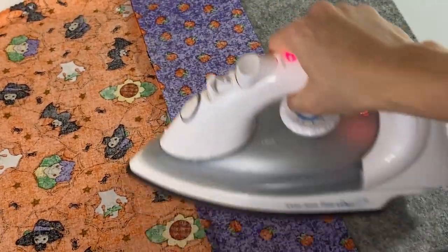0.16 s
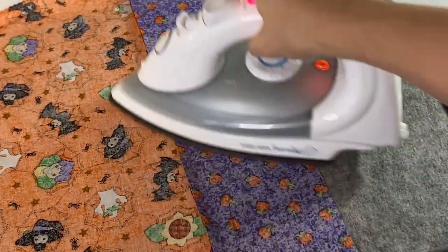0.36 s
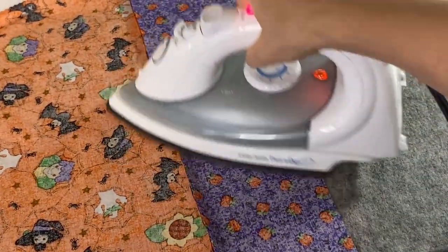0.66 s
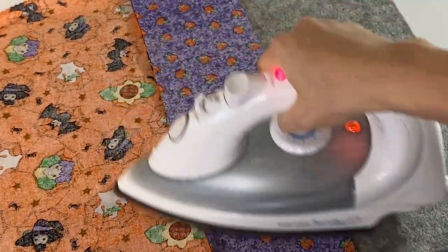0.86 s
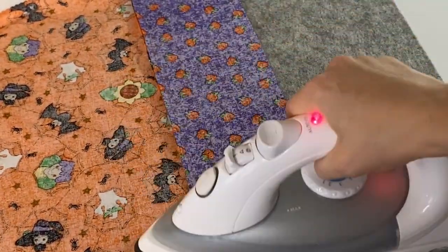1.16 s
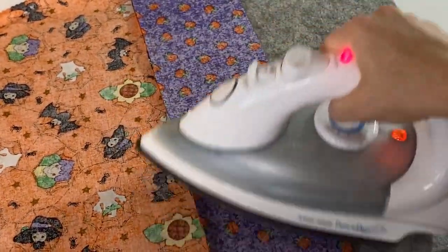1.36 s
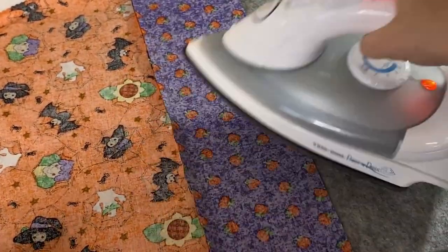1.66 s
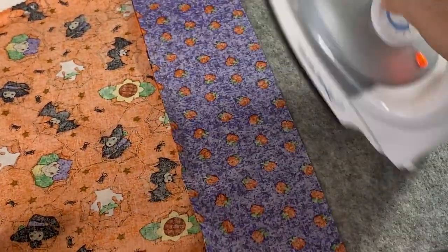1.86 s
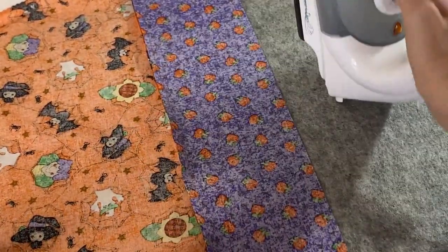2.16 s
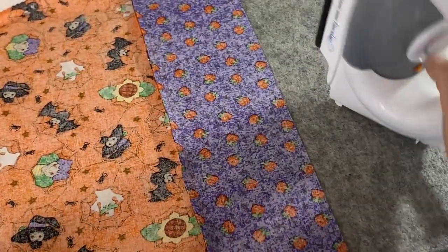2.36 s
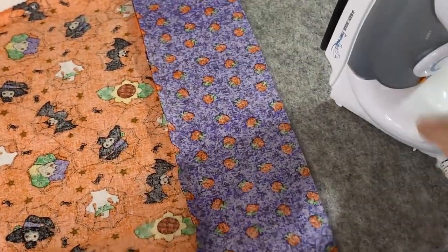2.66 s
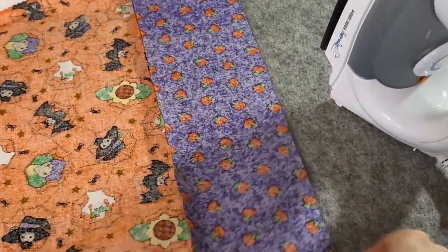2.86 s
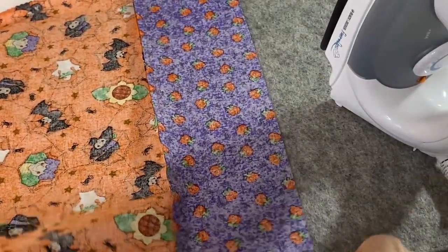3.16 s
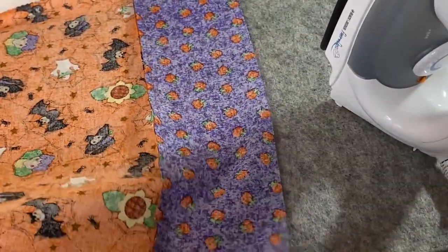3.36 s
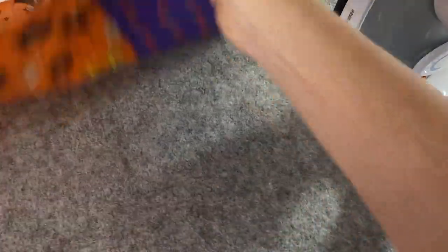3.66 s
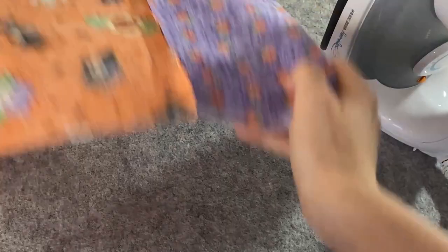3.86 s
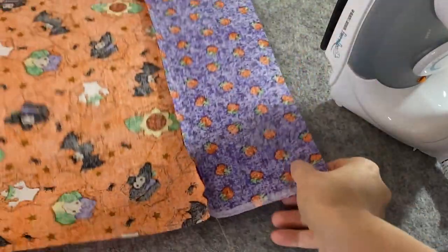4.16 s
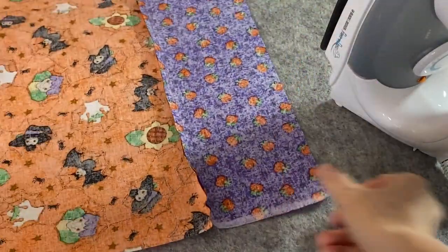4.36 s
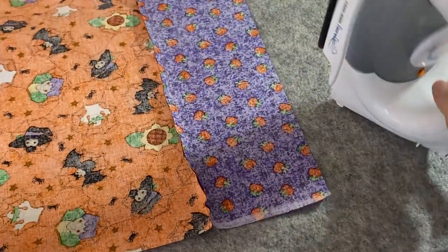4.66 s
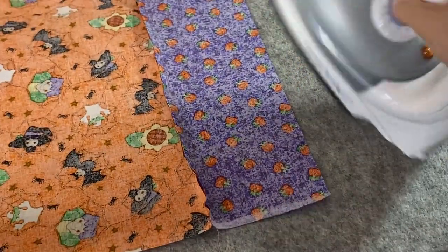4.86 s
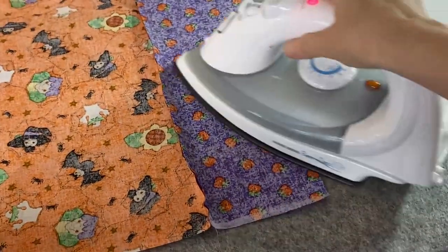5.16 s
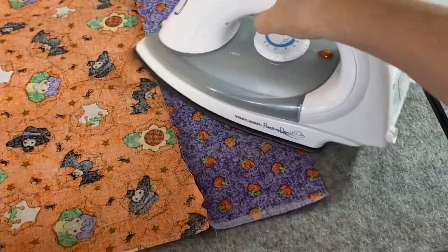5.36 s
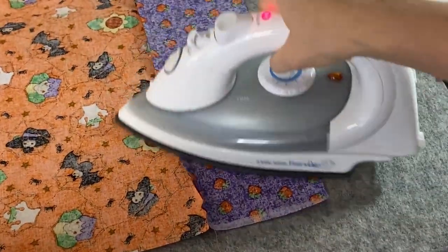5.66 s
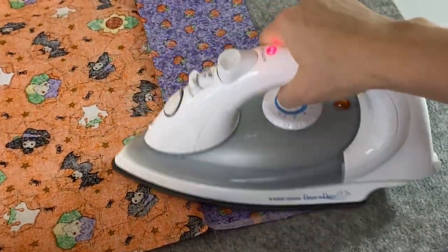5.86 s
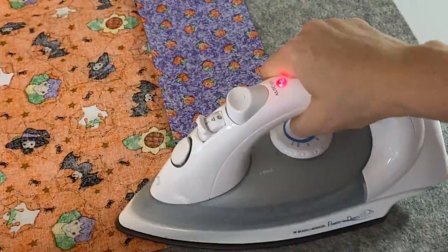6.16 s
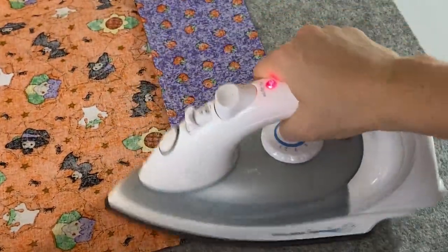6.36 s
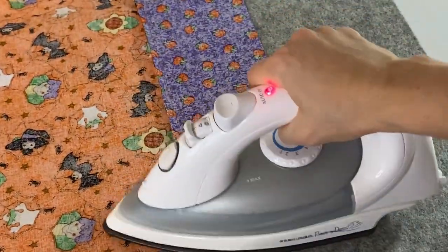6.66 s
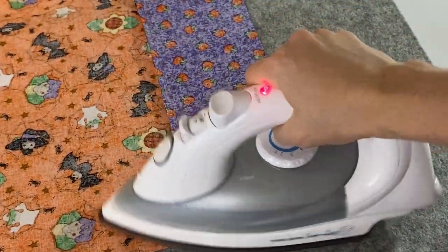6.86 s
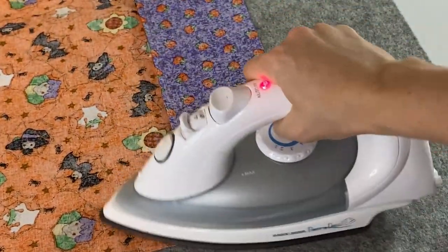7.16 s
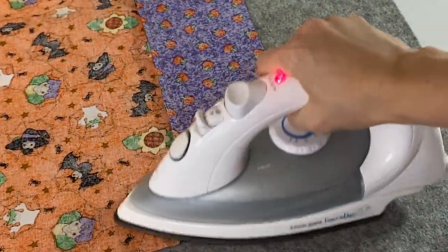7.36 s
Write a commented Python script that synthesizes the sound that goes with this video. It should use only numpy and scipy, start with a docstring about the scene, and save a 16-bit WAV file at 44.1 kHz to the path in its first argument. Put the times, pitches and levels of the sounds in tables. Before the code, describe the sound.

Close, quiet ironing sounds: low muffled thuds, brushing fabric and felt rustle, small plastic ticks, and one bright clack as the iron is picked up.

```python
"""Iron on cotton over a felt mat

Small quiet room, close pair of microphone ports: an iron is set down, slid and lifted on cotton laid over
a felt mat on a table, and a hand turns the cloth over. Sole and cloth hiss and the mat rustles: flickering
noise that follows the speed of each stroke. Below, the table rumbles as slow noise and thuds as struck modes;
the plastic housing ticks and creaks as short rough contacts that ring its modes."""
import sys
import numpy as np
from scipy import signal
from scipy.fft import rfft, irfft
from scipy.io import wavfile

SR = 44100
rng = np.random.default_rng(int(sys.argv[2]) if len(sys.argv) > 2 else 0)


def persist_wave(psi):
    """Save psi, clipped to +-1, as 16-bit WAV."""
    counts = np.round(np.clip(psi, -1, 1) * 32767).astype(np.int16)
    wavfile.write(sys.argv[1], SR, np.atleast_2d(counts).T)


N = 331146
HZ = np.maximum(np.fft.rfftfreq(N, 1 / SR), 1)   # transform grid, kept above 0 for the log axis


def from_db(db):
    """Level in dB to gain."""
    return 10 ** (np.asarray(db) / 20)


def in_time(rows):
    """Columns of a curve table, one value per sample."""
    s, *columns = np.transpose(rows)
    return [np.interp(np.arange(N) / SR, s, column) for column in columns]


def at_hz(points):
    """A spectrum table on the transform grid, straight on a log axis."""
    hz, value = np.transpose(points)
    return np.interp(np.log(HZ), np.log(np.maximum(hz, 1)), value)


def rms_one(x):
    """Scale to unit rms."""
    return x / np.sqrt(np.mean(x ** 2) + 1e-20)


def coloured(x, spectrum):
    """Filter by a spectrum that closes outside its ends."""
    inside = (HZ >= spectrum[0][0]) & (HZ <= spectrum[-1][0])
    return irfft(rfft(x) * from_db(at_hz(spectrum)) * inside, N)


def add(out, s, sound):
    """Mix a sound in at time s."""
    i = round(s * SR)
    out[i:i + len(sound)] += sound[:N - i]


def friction(level_db, spectrum, flicker_db, flicker_hz):
    """Fibres catching and slipping: flickering coloured noise; rows are direct, left room, right room."""
    slow = signal.butter(2, flicker_hz, fs=SR, output="sos")
    flicker = rms_one(signal.sosfilt(slow, rng.standard_normal(N)))
    noise = rms_one(coloured(rng.standard_normal((3, N)), spectrum))
    return from_db(level_db + flicker_db * flicker) * noise


# strokes of the sole or the hand over the cloth, levels at mid-stroke, fades from start to end (negative grows):
# t/s, length/s, hiss level/dB, sheen level/dB, mat rustle level/dB, fade of hiss and sheen/dB, fade of rustle/dB
STROKES = [(-0.08, 0.16, -58, -71, -49.5, 8, -1), (-0.1, 0.62, -66.5, -69, -66, -2, 4),
           (0.52, 0.12, -69.5, -73, -74, -9, 3), (0.597, 0.53, -65.5, -67, -62.5, 3, 13.5),
           (1.035, 0.12, -64, -84, -58, -2, 0), (1.134, 0.17, -75.5, -82, -80, 9, 0),
           (1.27, 0.15, -74, -77, -79, 0, 3), (1.343, 0.18, -67.5, -78, -57.5, 8, 17),
           (1.478, 0.23, -69, -83, -64.5, 0, 6), (1.653, 0.3, -71, -76, -60.5, -2, -4),
           (1.933, 0.3, -77, -78, -70.5, 9, 5), (2.158, 0.2, -71, -77, -58.5, -8, -2),
           (2.338, 0.26, -74, -81, -63.5, 7, -7), (2.458, 0.25, -79, -81, -64, 2, 15),
           (2.63, 0.13, -75.5, -74, -76, 0, 5), (2.736, 0.1, -69, -78, -60.5, -5, 15),
           (2.805, 0.24, -67, -70.5, -63, 1, 13), (3.024, 0.22, -67, -72, -68, 3.5, 10),
           (3.199, 0.26, -71, -75, -64, 13, 11), (3.385, 0.29, -66.5, -69.5, -62.5, -2, -6),
           (3.62, 0.32, -73.5, -78.5, -67, 4, -5), (3.893, 0.29, -76.5, -76.5, -84, -11, 1),
           (4.051, 0.17, -68, -70.5, -71.5, 0, -4), (4.223, 0.14, -76.5, -78, -73.5, -4, -6),
           (4.61, 0.24, -71, -77, -69, -2, -8), (4.689, 0.095, -66, -70, -55, 7, 0),
           (4.784, 0.36, -77.5, -86, -60.5, 4, 2), (5.051, 0.15, -61, -70, -54.5, 11, 3),
           (5.116, 0.36, -67.5, -70.5, -63.5, 3.5, -3), (5.46, 0.724, -67, -69.5, -66, 4, 15),
           (6.152, 0.2, -67, -69, -63.5, 1, 2), (6.327, 0.16, -67, -66, -64, 3, 0),
           (6.472, 0.13, -62.5, -67, -61, 0, -4), (6.583, 0.14, -67.5, -68.5, -68, 3, 13),
           (6.702, 0.14, -66, -67, -64.5, 4, -13), (6.822, 0.14, -70, -68.5, -69, 4, 11),
           (6.935, 0.26, -68.5, -68.5, -63, 1, -7), (7.16, 0.14, -70, -72, -64, 7, -16),
           (7.252, 0.47, -65.5, -67.5, -65.5, -6, -2)]
# hiss, sheen and rustle: power of the speed with which each one's amplitude grows
SPEED_POWERS = (0.52, 0.76, 0.54)
# hiss, sheen and rustle with nothing moving: level/dB
STILL_DB = (-85.5, -90.5, -72.5)
SPEED_UP_S, SLOW_DOWN_S = 0.057, 0.072   # a stroke gathers and loses speed
ARCH = 0.3   # share of the speed that swells towards mid-stroke


def strokes():
    """Levels in dB of hiss, sheen and rustle: each follows the speed of the stroke and fades along it."""
    t = np.arange(N) / SR
    power = from_db(STILL_DB)[:, None] ** 2 * np.ones(N)
    for s, length, *levels_db, fade_db, mat_fade_db in STROKES:
        speeding_up, slowing_down = (t - s) / SPEED_UP_S, (s + length - t) / SLOW_DOWN_S
        speed = np.clip(np.minimum(speeding_up, slowing_down), 0, 1)
        on = speed > 0
        along = (t[on] - s) / length - .5   # -0.5 at the start, 0.5 at the end
        swell = speed[on] * (1 - ARCH + ARCH * np.cos(np.pi * along))
        fades_db = (fade_db, fade_db, mat_fade_db)
        for row, db, growth, fade in zip(power, levels_db, SPEED_POWERS, fades_db):
            row[on] += (from_db(db - fade * along) * swell ** growth) ** 2
    return 10 * np.log10(power)


# colour of the cloth's hiss: f/Hz, relative level/dB per Hz
HISS = [(700, -11), (1100, -1), (1600, -1.5), (2200, -1), (3000, 0.5), (4200, -2.5), (5500, -3), (7000, -7),
        (9000, -25)]
# colour of the treble sheen over it: f/Hz, relative level/dB per Hz
SHEEN = [(5500, -20.5), (7500, 2), (10000, 1.5), (12000, -2), (14000, -2.5), (15500, -2)]


def cloth_slide(hiss_db, sheen_db):
    """Sole and cotton rub: a hiss and a finer treble sheen, each flickering on its own."""
    hiss = friction(hiss_db, HISS, flicker_db=0.85, flicker_hz=22.5)
    return hiss + friction(sheen_db, SHEEN, flicker_db=1.0, flicker_hz=20)


# colour of the felt mat's rustle: f/Hz, relative level/dB per Hz
RUSTLE = [(200, 0), (300, 1), (450, -2.5), (650, -5.5), (900, -13.5), (1300, -23), (2000, -24.5)]


def mat_rustle(rustle_db):
    """The felt under the stroke catches more unevenly, a low rustle with deep flicker."""
    return friction(rustle_db, RUSTLE, flicker_db=2.8, flicker_hz=25)


# rumble of the table under the weight: t/s, deep level/dB, upper level/dB
PUSH = [(0.0, -61, -57), (0.21, -52, -68), (0.44, -66, -62.5), (1.38, -61.5, -62.5), (2.2, -68.5, -62.5),
        (2.49, -54, -63.5), (2.95, -67.5, -60.5), (3.49, -57.5, -67), (3.62, -53.5, -53),
        (3.78, -55, -59.5), (4.1, -63, -71.5), (4.31, -68, -61.5), (4.6, -57.5, -68), (5.23, -58.5, -61),
        (5.83, -66, -68.5), (6.32, -65, -64.5), (6.98, -63, -63), (7.51, -62, -68)]
# colour of the deep rumble: f/Hz, relative level/dB per Hz
DEEP = [(20, -39), (35, -11), (55, -6.5), (80, -4), (110, -14), (150, -26.5)]
# colour of the upper rumble: f/Hz, relative level/dB per Hz
UPPER = [(80, -17), (115, -1), (170, -1), (250, -8), (330, -23), (450, -16)]


def table_rumble():
    """The table under the shifting weight: two bands of low noise, each with its own slow level."""
    deep_db, upper_db = in_time(PUSH)
    deep = friction(deep_db, DEEP, flicker_db=1.7, flicker_hz=19)
    return deep + friction(upper_db, UPPER, flicker_db=3.0, flicker_hz=8.2)


def ring(force, hz, t60):
    """One mode: a unit click sets a decaying sine of starting height 1 ringing."""
    r = from_db(-60 / (t60 * SR))
    w = 2 * np.pi * hz / SR
    return signal.lfilter([0, np.sin(w)], [1, -2 * r * np.cos(w), r * r], force)


def body(modes, force, stiff_db):
    """All modes of one part, scaled to peak 1; stiff_db an octave favours the upper ones."""
    out = 0
    for k, (hz, db, t60) in enumerate(modes):
        mode = ring(force, hz, t60)
        height = from_db(db + stiff_db * np.log2(hz / modes[0][0]))
        out = out + (-1) ** k * height * mode / np.abs(mode).max()
    return out / np.abs(out).max()


# ticks and creaks of the housing, levels ahead of colouring and ports:
# t/s, crack level/dB, hollow knock level/dB, bright edge level/dB, contact/ms,
# ring of the hard modes against the crack level/dB
TICKS = [(0.0441, -44, -52.5, -55.5, 4.6, -19), (0.554, -55.5, -81, -66, 2.4, -10),
         (0.6169, -43.5, -64, -54, 2.9, -15), (1.1117, -45.5, -59, -67, 5.7, -15),
         (1.353, -49, -59, -62.5, 9.6, -6), (1.419, -52, -62.5, -78, 2.1, -8),
         (1.5213, -53, -68, -80, 2.4, -10), (1.834, -47, -46, -73, 8.1, -14),
         (1.8678, -41, -78, -59, 2.2, -26), (1.8848, -46.5, -44.5, -69, 3.1, -3.5),
         (1.949, -50, -54, -63, 6, 15.5), (2.0317, -72, -56.5, -79, 1.3, -3),
         (2.1885, -53, -57.5, -82, 1.3, -8), (2.2077, -47.5, -63, -69, 5.3, -25),
         (2.2821, -56, -53, -54, 2.3, 0.5), (2.4519, -40, -50.5, -76, 1.6, -15.5),
         (2.7557, -41.5, -57.5, -67, 12, -8), (3.2282, -51.5, -53.5, -63, 3.7, -11),
         (3.347, -55, -63, -70, 2.5, -10), (3.4173, -59, -60, -74, 3, -8),
         (3.6104, -48, -57.5, -70, 2, -23), (3.8186, -55, -61.5, -69, 10, -10),
         (4.6279, -46.5, -60.5, -56, 3.9, -19), (4.7201, -47, -46.5, -71, 2, -9),
         (4.7312, -55, -44, -73, 2.8, -12), (4.7404, -59, -46, -77, 6, -4),
         (4.7644, -54, -52, -79, 1.9, -12), (4.7884, -66, -52, -80, 1.5, 0),
         (4.848, -38, -59, -88, 3.8, -8.5), (4.9493, -60, -57.5, -88, 2.7, -9),
         (5.0099, -47, -67, -86, 8.5, -11), (5.062, -25, -43, -48, 2.6, -33),
         (5.0758, -35.5, -51, -46, 9, -18), (5.3512, -59, -56, -60.5, 2.1, -4),
         (5.489, -41.5, -56, -56.5, 4, -19), (5.5014, -40, -58, -76, 4.1, -12),
         (5.941, -44, -56, -58, 5.2, -16), (6.067, -54, -66, -60, 3.6, -12),
         (6.1608, -40.5, -59.5, -48.5, 3.6, -18), (6.186, -62, -72, -60, 2.5, -12),
         (6.334, -40.5, -59.5, -55, 2.7, -29), (6.3476, -41.5, -52, -49.5, 1.7, -15),
         (6.367, -51, -59, -53, 3.6, -13), (6.5176, -53, -52, -59, 6.1, 1), (6.7298, -43, -61, -58, 3, -25),
         (7.047, -60, -71, -44, 2, -5), (7.3873, -70, -64, -48.5, 2.8, -14),
         (7.4028, -44, -70, -53, 2.5, -20), (7.422, -41.5, -51, -50, 2.6, -8)]
# hollow modes of the housing: f/Hz, level/dB, t60/s
HOLLOW = [(444, 1.5, 0.0054), (620, 2, 0.015), (708, -2.5, 0.037), (826, -1.5, 0.02), (943, -8.5, 0.04),
          (1193, -3, 0.0085)]
# hard modes of the housing: f/Hz, level/dB, t60/s
HARD = [(2740, -2, .045), (3000, -1, .05), (3340, 0, .04), (3700, -9, .03), (4300, -14, .04),
        (5580, -11, .045), (10700, -22, .04), (13420, -17, .08)]
# colour of the crack: f/Hz, gain/dB
CRACK = [(900, 5), (1400, -1), (2000, -2.5), (2400, 3.5), (2900, 2.5), (3500, 0.5), (4500, -3), (6000, -42)]
# colour of the bright edge: f/Hz, gain/dB
BRIGHT = [(3500, 11.4), (5000, 10), (7000, 8.7), (10000, 9.5), (13000, 0.33), (16000, 8.1)]
# colour of the loose rattle: f/Hz, gain/dB
RATTLE = [(1500, -31), (2300, -5), (2900, 2), (3600, -9), (5000, -30)]
RATTLE_DB, RATTLE_MS = -11, 59   # loose parts shake on after a tick: level under the ring, decay constant
CREST_DB = 6.5   # peak of a hollow knock over its table level


def ticks():
    """A short rough contact gives a broad crack with a bright edge, rings the modes and leaves a loose rattle."""
    out, crack, edge, rattle = np.zeros((4, N))
    t = np.arange(SR // 4) / SR
    draws = rng.standard_normal((len(TICKS), 5, len(t)))
    for (s, crack_db, hollow_db, bright_db, contact_ms, ring_db), draw in zip(TICKS, draws):
        x = 1000 * t / contact_ms
        force = draw * (1 - np.exp(-6 * x)) * np.exp(-x)
        hard_db = crack_db + ring_db
        stiff_db = 2.8 * min(ring_db + 1, 0)   # only clear, ringing blows reach the top modes
        add(out, s, from_db(hard_db) * body(HARD, force[0], stiff_db))
        add(out, s, from_db(hollow_db + CREST_DB) * body(HOLLOW, force[1], 0))
        add(crack, s, from_db(crack_db) * force[2])
        add(edge, s, from_db(bright_db) * force[3] * np.exp(-.4 * x))   # the treble dies first
        shake = draw[4] * np.exp(-1000 * t / RATTLE_MS)
        add(rattle, s, from_db(hard_db + RATTLE_DB) * shake)
    return out + coloured(crack, CRACK) + coloured(edge, BRIGHT) + coloured(rattle, RATTLE)


# thuds on the table, ahead of the ports: t/s, peak level/dB, centre of the blow f/Hz, added damping/(1/s)
THUDS = [(0.046, -32.5, 154, 30), (0.054, -29.5, 133, 30), (0.057, -36, 332, 49), (0.065, -23.5, 89.5, 28),
         (0.085, -26, 73, 21), (0.159, -28.5, 68.4, 21), (0.176, -34, 72, 62), (1.25, -50.5, 58, 20),
         (1.831, -43.5, 178, 35), (2.275, -47, 148, 53), (2.497, -43, 273, 22), (2.848, -38.5, 178, 22),
         (3.146, -38, 52.3, 8), (3.236, -43.5, 172, 26), (3.448, -39, 65, 22), (3.493, -36.5, 72, 40),
         (3.561, -40, 61.5, 45), (3.627, -37.5, 112, 20), (3.663, -36.5, 71, 23), (3.71, -33.5, 66, 37),
         (3.868, -38.5, 49.5, 10), (3.939, -35.5, 159, 74), (3.952, -28, 69, 37), (4.51, -44.5, 51, 7.4),
         (5.068, -38.5, 69, 15), (5.073, -40.5, 200, 7.6), (5.09, -35.5, 54, 46), (5.105, -41, 192, 7.3),
         (5.134, -43, 196, 8.6), (5.18, -40.5, 154, 23), (5.358, -47, 267, 86), (6.504, -45, 175, 11),
         (6.53, -44.5, 274, 23), (6.749, -45, 138, 23), (6.777, -43, 118, 10), (6.997, -39, 145, 14),
         (7.02, -43.5, 140, 14), (7.236, -39, 164, 3.3), (7.271, -41, 144, 21)]
# modes of the table top, with no weight on it: f/Hz, level/dB, t60/s
TABLE = [(51.3, 0, 0.59), (64.3, 3.5, 0.51), (74.5, 8, 0.45), (104.3, 10.5, 0.14), (141.7, 2, 0.72),
         (159.7, 3.5, 0.33), (206, 0, 0.41), (290.4, 7.5, 0.084), (363.7, -1, 0.19)]
THUD_CONTACT_MS = 7.6   # build-up time of a mode at the centre of the blow


def thuds():
    """Each blow excites the table modes nearest its centre; the resting weight damps them."""
    out, t = np.zeros(N), np.arange(SR // 2) / SR
    for s, peak_db, centre_hz, damping in THUDS:
        sound = np.zeros(len(t))
        for hz, mode_db, t60 in TABLE:
            off_db = -14 * np.log2(hz / centre_hz) ** 2
            decay = np.log(1000) / t60 + damping
            x = 1000 * t / THUD_CONTACT_MS * hz / centre_hz
            rise = 1 - np.exp(-x ** 1.11)   # low modes build up later
            sine = np.sin(2 * np.pi * hz * t)
            sound -= from_db(mode_db + off_db) * rise * sine * np.exp(-decay * t)
        add(out, s, from_db(peak_db) * sound / np.abs(sound).max())
    return out


ROOM_T60_S = 0.18


def in_room(blows):
    """The small room answers with dying noise tails; rows are direct, left room, right room."""
    t = np.arange(SR // 2) / SR
    tails = rng.standard_normal((2, len(t))) * from_db(-60 * t / ROOM_T60_S)
    tails /= np.sqrt(np.sum(tails ** 2, axis=1, keepdims=True))   # unit energy
    return np.vstack([blows, irfft(rfft(blows) * rfft(tails, N), N)])


# phase between the microphone ports: f/Hz, lead of the left/rad
LEAD = [(0, 0), (950, 0.3), (1290, 0.2), (4130, -0.2), (5600, -0.9), (6630, -0.6), (6980, 0.1), (7320, 1.8),
        (8350, 2.9), (9560, 3.3), (11800, 6.2), (13000, 6.6), (14600, 9.2), (15300, 9.5)]
# level between the ports: f/Hz, left minus right level/dB
TILT = [(100, 0), (300, -2), (750, -3), (1300, 0), (2500, 1), (4500, -0.1)]
# room sound against direct sound: f/Hz, level/dB
WET = [(60, -21.5), (200, -8), (600, -1), (1500, -1.5), (2500, -8.5), (4000, -14.5), (7000, -33),
       (15000, -35)]


def ports(sound):
    """Both ports get the direct sound with their own phase and tilt, plus the room sound of their side."""
    hz, lead = np.transpose(LEAD)
    half = np.array([[.5], [-.5]])   # left and right share each difference
    wet, parts = from_db(at_hz(WET)), rfft(sound)
    direct = np.exp(1j * half * np.interp(HZ, hz, lead)) * parts[0]
    mixed = (direct + wet * parts[1:]) / np.sqrt(1 + wet ** 2)
    return irfft(from_db(half * at_hz(TILT)) * mixed, N)


def scene():
    """All sources, heard through the two ports."""
    hiss_db, sheen_db, rustle_db = strokes()
    rubbing = cloth_slide(hiss_db, sheen_db) + mat_rustle(rustle_db)
    blows = in_room(ticks() + thuds())
    return ports(rubbing + table_rumble() + blows)


BASS_HZ, TOP_STOP_HZ = 29.2, 16650   # bass corner; from the second on, the top is 60 dB down


def record(dry):
    """The microphone loses the deepest bass, and the top is cut."""
    dry = signal.sosfilt(signal.butter(2, BASS_HZ, "high", fs=SR, output="sos"), dry)
    return signal.sosfilt(signal.cheby2(12, 60, TOP_STOP_HZ, fs=SR, output="sos"), dry)


dry = scene()
out = record(dry)
persist_wave(out)
```